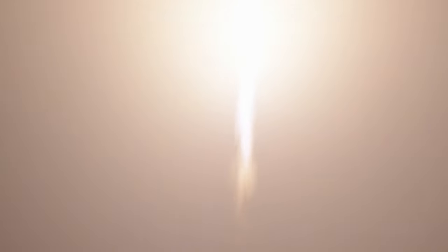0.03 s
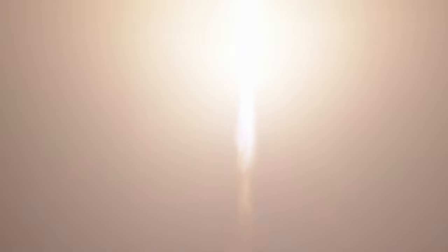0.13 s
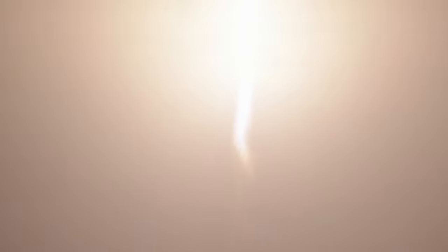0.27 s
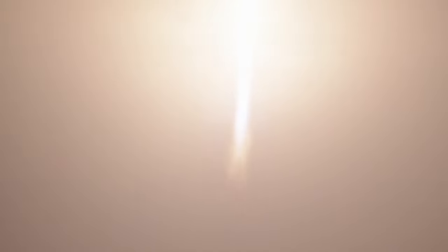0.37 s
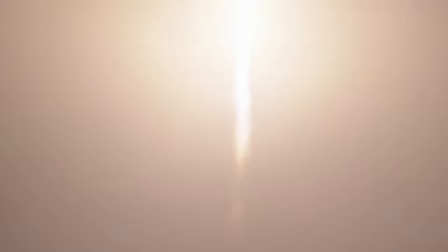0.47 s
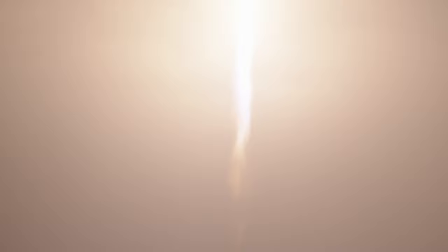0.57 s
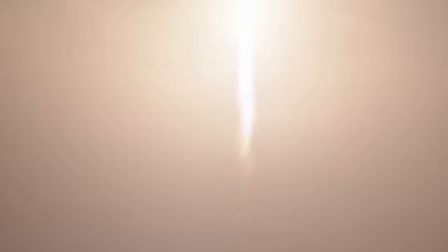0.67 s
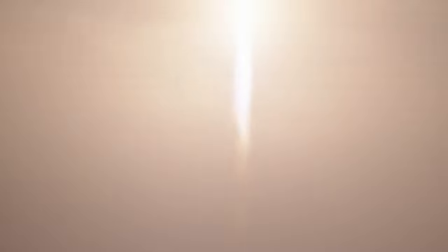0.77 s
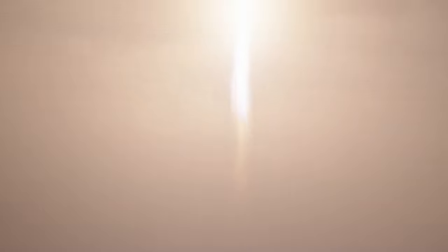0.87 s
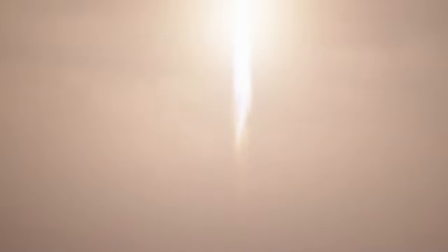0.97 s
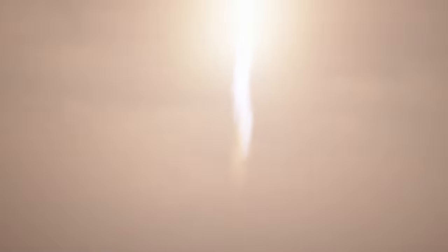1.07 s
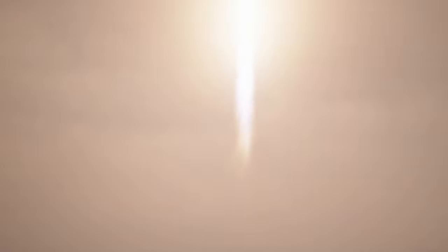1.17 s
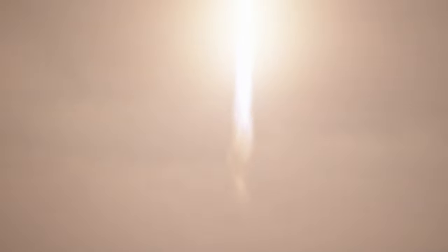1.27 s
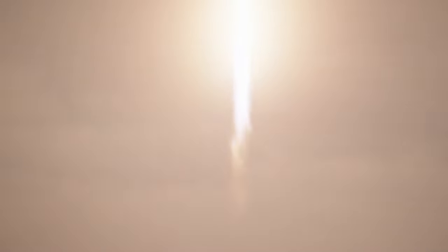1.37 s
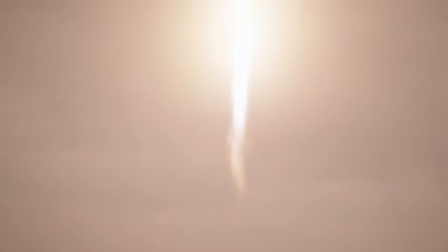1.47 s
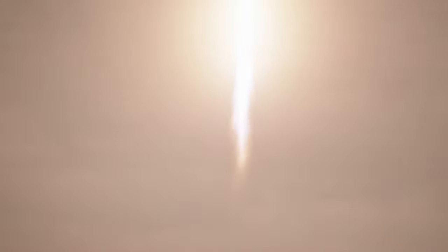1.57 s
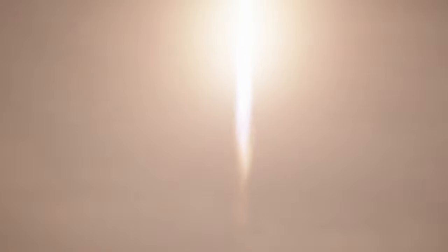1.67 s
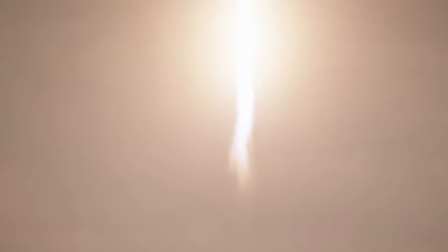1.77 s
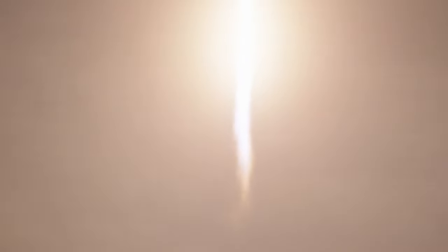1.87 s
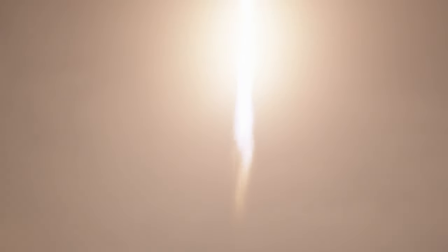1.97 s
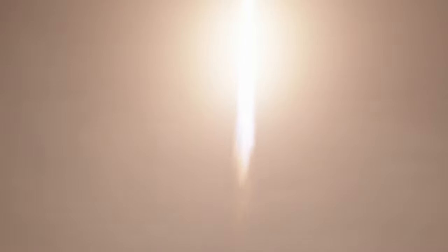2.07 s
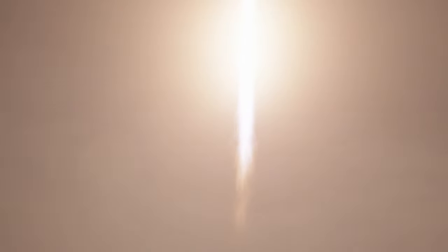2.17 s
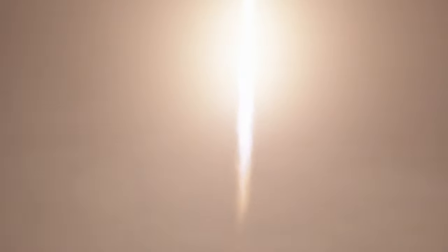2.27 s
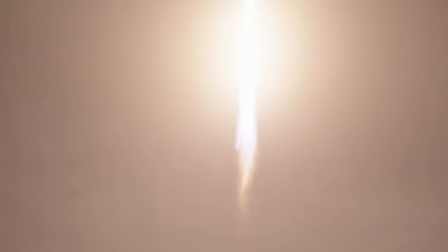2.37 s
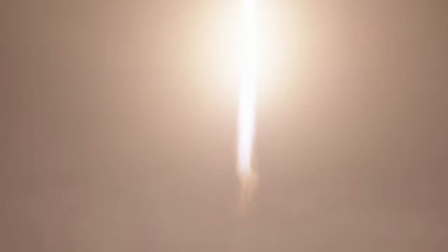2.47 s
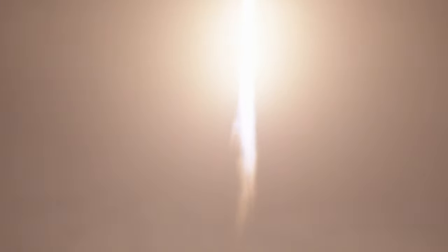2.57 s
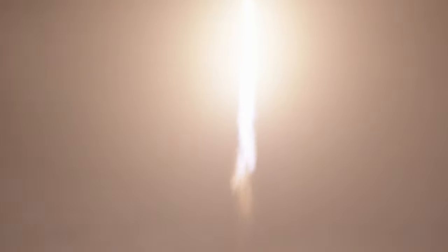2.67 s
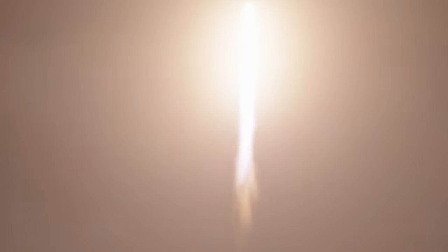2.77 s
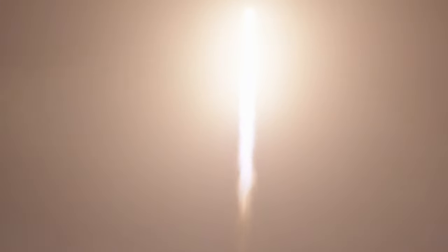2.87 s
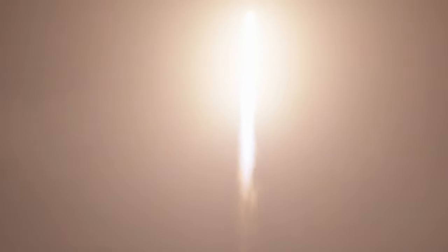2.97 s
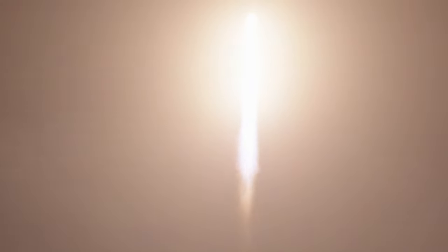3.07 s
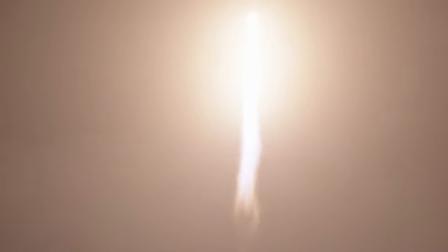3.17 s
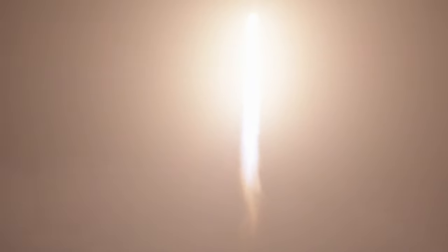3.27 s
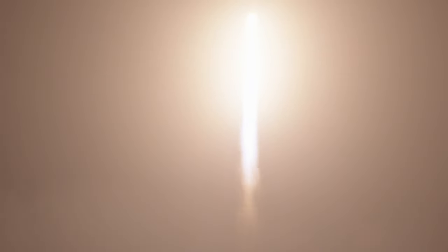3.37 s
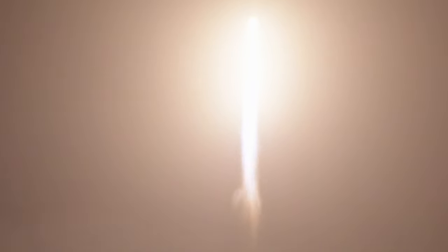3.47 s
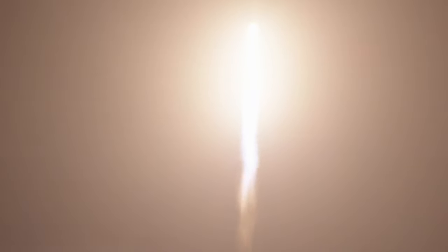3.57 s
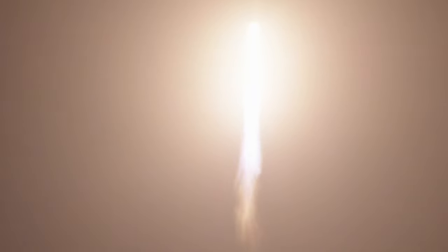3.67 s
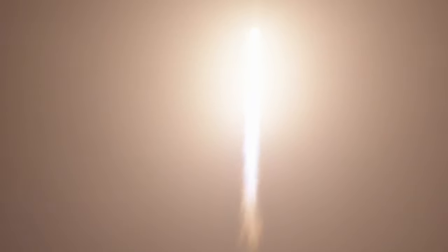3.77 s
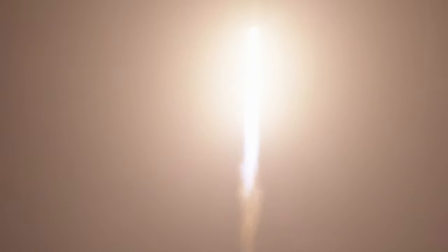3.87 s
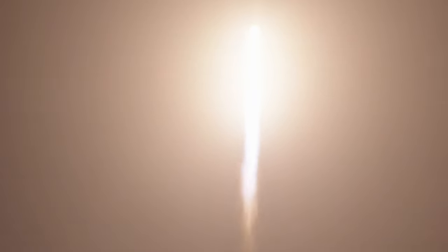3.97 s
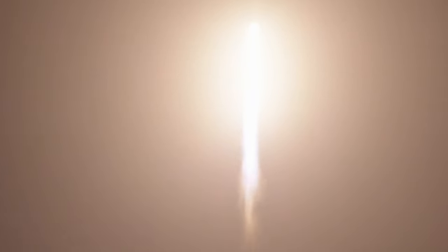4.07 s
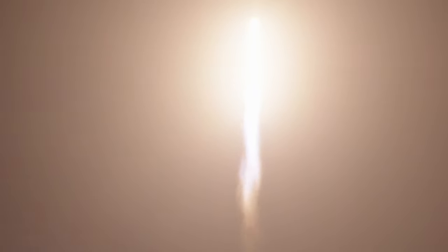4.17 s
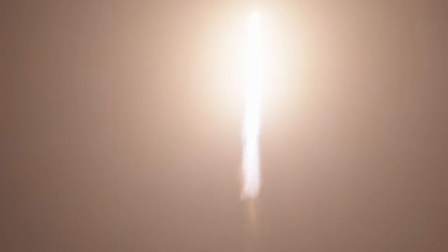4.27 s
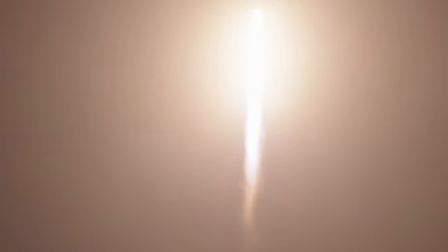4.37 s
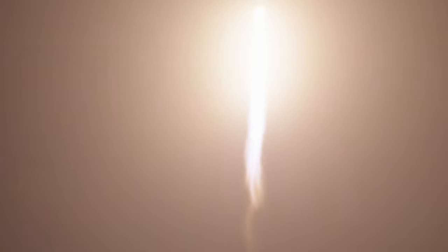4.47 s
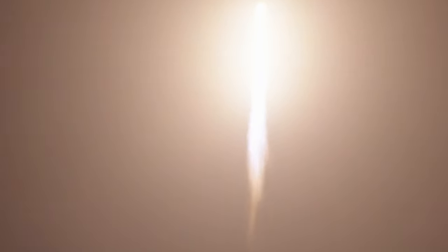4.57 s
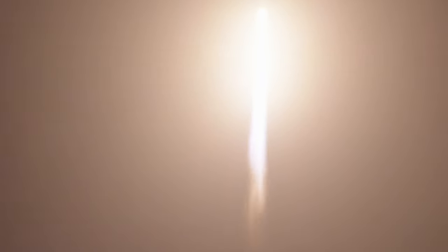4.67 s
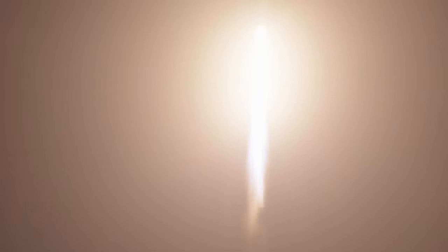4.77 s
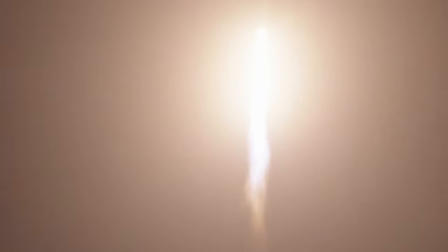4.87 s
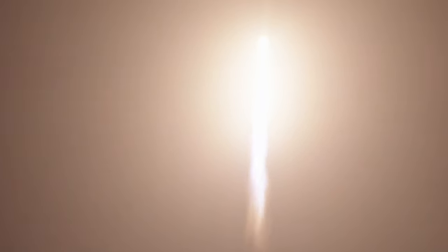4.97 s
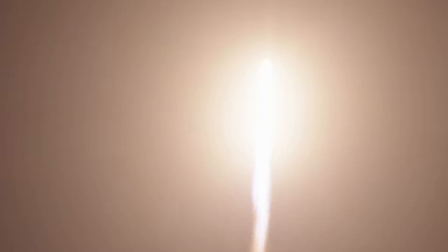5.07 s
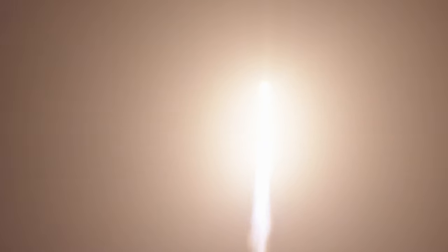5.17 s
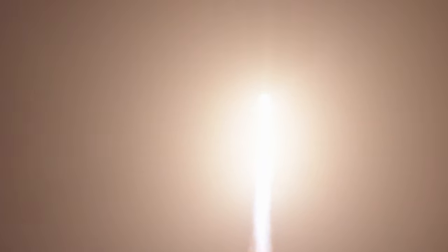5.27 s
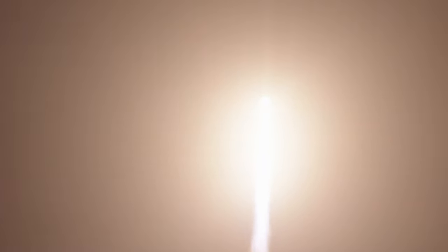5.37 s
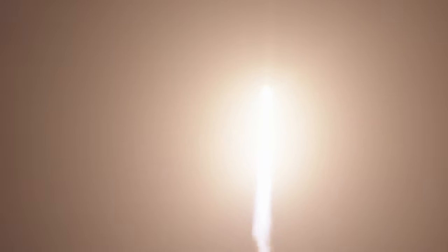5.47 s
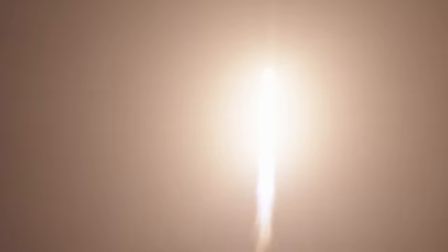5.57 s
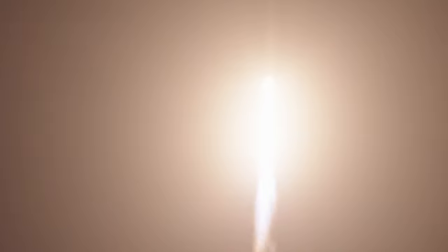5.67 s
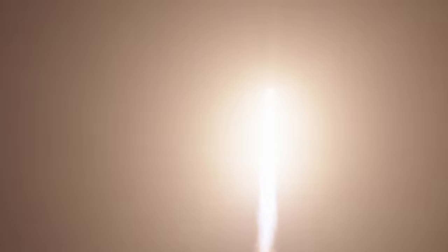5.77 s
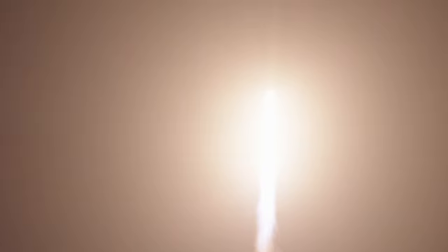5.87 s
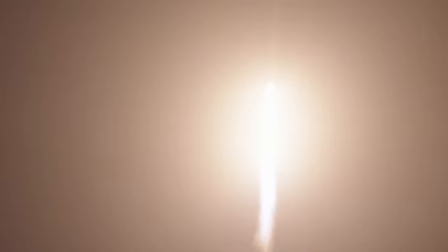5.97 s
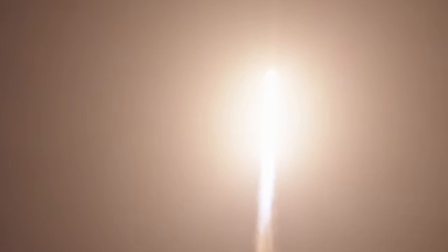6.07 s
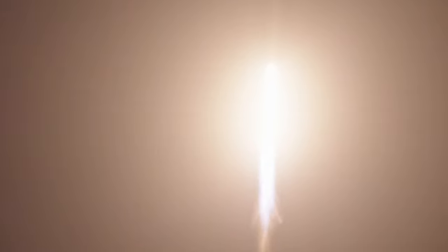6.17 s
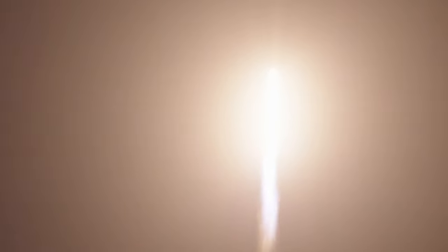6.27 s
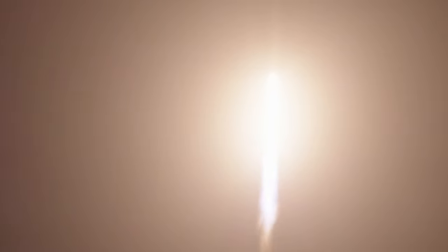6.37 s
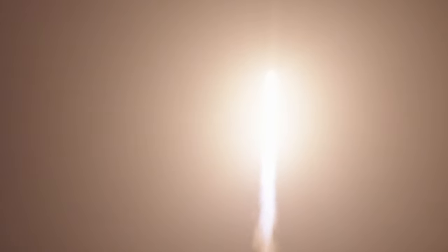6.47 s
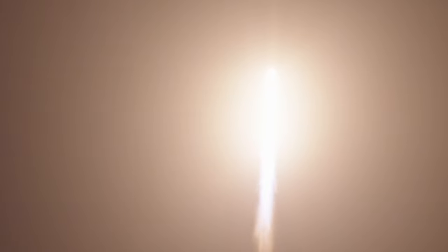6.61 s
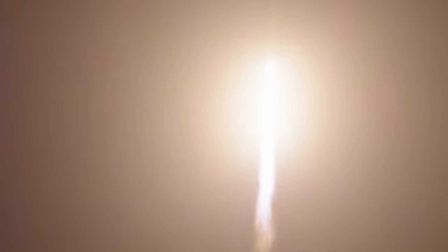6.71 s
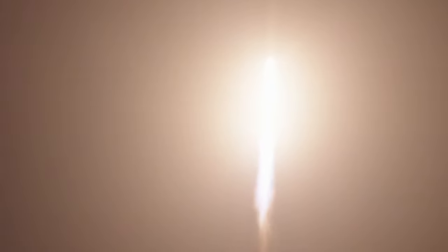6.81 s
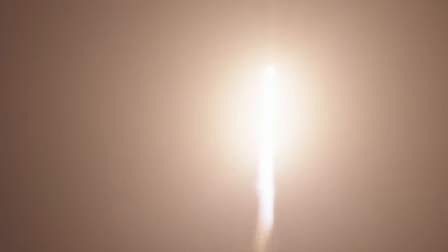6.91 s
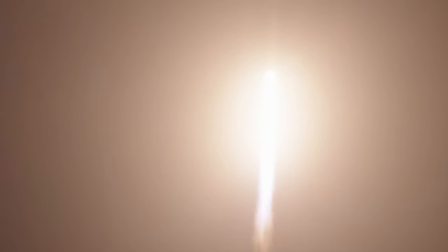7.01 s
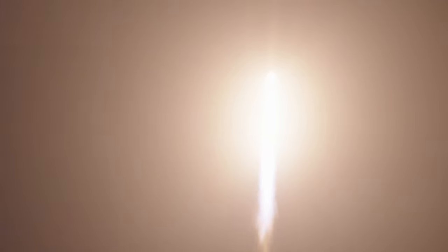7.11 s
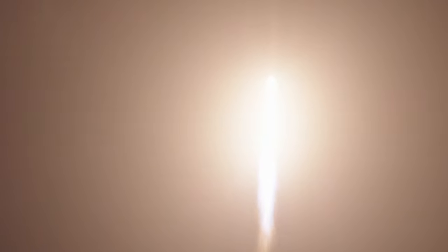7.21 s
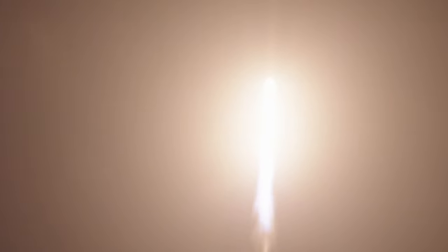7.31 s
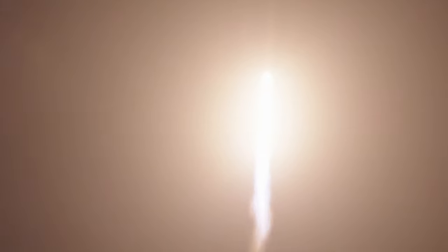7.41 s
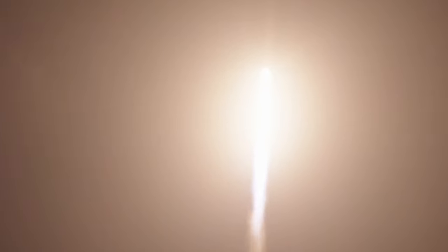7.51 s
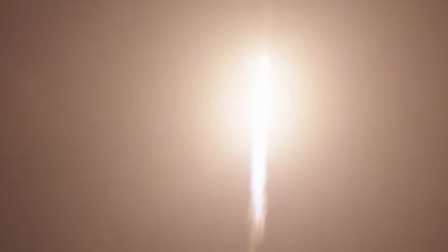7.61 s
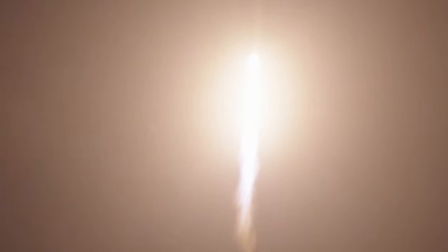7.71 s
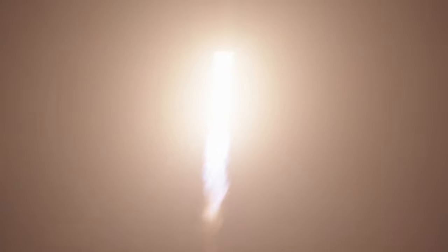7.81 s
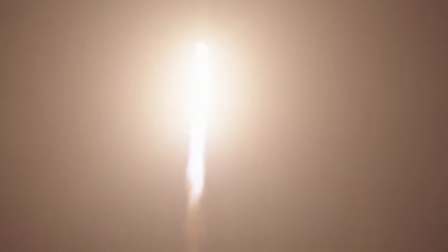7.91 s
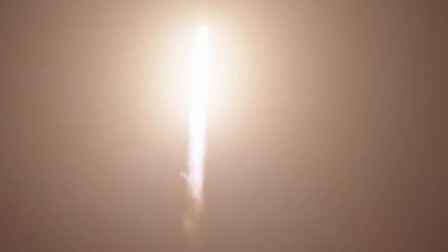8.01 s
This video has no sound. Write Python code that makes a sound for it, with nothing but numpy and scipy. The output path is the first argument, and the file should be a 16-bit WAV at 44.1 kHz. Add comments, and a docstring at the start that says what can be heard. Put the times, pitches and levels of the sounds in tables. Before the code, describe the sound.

A small microphone's hiss and thin whine frame the faint bass rumble of a distant rocket in open air. The rumble gradually grows, with muffled sputters and breathy puffs. After more than five seconds, separate dull thumps break through, then come faster and brighter, becoming a ripping barrage of hard cracks with bright sizzle between them, distorting and still loud when it stops.

```python
"""Outdoors, far from a launch: a rocket climbs away; its noise grows as the plume turns toward the listener.
Shaped noise makes the jet's turbulent rumble and roar; random bursts make its crackle, puffs and sizzle.
Its strongest pressure waves steepen into shocks: dull, scattered thuds at first, then sharp cracks that
overload a small microphone. The electronics add steady hiss, a faint harmonic whine and a lone tone."""
import sys
import numpy as np
from scipy import signal
from scipy.fft import rfft, irfft, next_fast_len
from scipy.io import wavfile
from scipy.ndimage import uniform_filter1d

SR = 44100
rng = np.random.default_rng(int(sys.argv[2]) if len(sys.argv) > 2 else 0)


def int16_out(signal):
    """Quantize to a 16-bit WAV file."""
    q = np.round(np.clip(np.atleast_2d(signal).T, -1, 1) * 32767)
    wavfile.write(sys.argv[1], SR, q.astype(np.int16))


N = 355005

# jet loudness, the drive of turbulence and weak shocks: [t/s, drive level/dB]
JET = [(0.0, -40.5), (1.75, -39), (2.0, -38.5), (4.0, -35), (4.3, -33.5), (4.95, -33), (5.3, -30.5),
       (5.95, -29.5), (6.4, -28.5), (6.7, -25.5), (7.15, -28.5), (7.9, -13)]
# loudest shock waves, peaks before the gains in shocks(): [t/s, compression level/dB, crack level/dB]
SHOCKS = [(5.672, -21, -30.5), (5.7435, -21, -35), (5.805, -22.5, -35.5), (5.8402, -18.5, -31),
          (5.871, -16.5, -35), (5.9283, -23, -28.5), (5.9717, -14.5, -31.5), (6.013, -17, -31.5),
          (6.0473, -18, -32), (6.132, -18.5, -31.5), (6.1746, -20.5, -35), (6.2097, -20, -28),
          (6.2421, -15, -27.5), (6.334, -14.5, -27), (6.4667, -15.5, -28), (6.538, -11, -27),
          (6.565, -14.5, -28), (6.6079, -11, -27), (6.638, -13, -20.5), (6.6762, -9.5, -23.5),
          (6.7414, -12, -24.5), (6.764, -10.5, -25.5), (6.8221, -13, -25), (6.862, -12.5, -28),
          (6.881, -14, -24), (6.912, -10.5, -21), (6.9398, -8, -25), (6.9557, -9.5, -25.5),
          (6.99, -7.5, -20.5), (7.026, -12, -22), (7.0557, -8.5, -16.5), (7.077, -7.5, -17.5),
          (7.087, -12, -27), (7.1021, -12.5, -23), (7.1241, -7, -16.5), (7.1426, -6, -15),
          (7.1613, -16, -22), (7.1904, -4.5, -16), (7.199, -13, -19.5), (7.216, -6, -13),
          (7.235, -6.5, -11.5), (7.2584, -6.5, -11.5), (7.2686, -5, -11.5), (7.3048, -9, -19.5),
          (7.3185, -10, -16), (7.3245, -6.5, -17), (7.3508, -5.5, -9), (7.368, -9.5, -22),
          (7.3944, -7.5, -18), (7.4183, -6.5, -12.5), (7.451, -5.5, -15), (7.484, -9.5, -22),
          (7.4974, -13, -18.5), (7.5195, -0.5, -10), (7.551, -7, -9.5), (7.566, -10.5, -13.5),
          (7.572, -11, -19), (7.5836, -4.5, -10.5), (7.6114, -7, -9), (7.6186, -5, -13.5),
          (7.6484, -5.5, -8.5), (7.6875, -4.5, -17.5), (7.7274, -9, -9.5), (7.7616, -6.5, -9.5),
          (7.7734, -9, -10.5), (7.7878, -6.5, -13.5), (7.8051, -7, -8.5), (7.837, -7.5, -9.5),
          (7.8566, 2, -11), (7.874, -7, -14.5), (7.899, -8, -19.5), (7.9127, -3, -6), (7.936, -5.5, -12.5),
          (7.9642, -7, -22.5), (7.9773, -12.5, -21), (8.0061, -3.5, -14), (8.0285, -9, -21.5)]
# spectrum of blurred weak fronts: [f/Hz, relative level/dB]
PUFF_COLOUR = [(200, -13), (550, 6), (1200, 1), (2050, -4.5), (3000, -13.5), (4000, -20), (5400, -33),
               (7500, -43.5), (16000, -46)]
# above this drive the growth goes mostly into shocks; turbulence keeps only a share of it
BREAK_DB, TURBULENCE_SHARE = -27, .22
# roar relative to the jet's drive, and its ceiling
ROAR_DB, ROAR_CEILING_DB = -20.4, -43.5


def undb(db):
    """Decibels to gain."""
    return 10 ** (np.asarray(db) / 20)


def unit(x):
    """Scale to rms 1."""
    return x / np.sqrt(np.mean(x ** 2))


def curve(rows):
    """Join (t/s, value) rows by straight lines, one value per sample."""
    return np.interp(np.arange(N) / SR, *np.transpose(rows))


def response(points, size):
    """Minimum-phase (causal) frequency response through (f/Hz, level/dB) points, via the folded cepstrum."""
    hz, db = np.transpose(points)
    log_hz = np.log(np.fft.rfftfreq(size, 1 / SR) + 1)
    cepstrum = irfft(np.log(undb(np.interp(log_hz, np.log(hz), db))))
    cepstrum[1:size // 2] *= 2
    cepstrum[size // 2 + 1:] = 0
    return np.exp(rfft(cepstrum))


def colour(x, points):
    """Give a signal a spectrum and rms 1."""
    size = 2 * next_fast_len(N // 2 + 1)
    shaped = irfft(rfft(x, size) * response(points, size))
    return unit(shaped[:N])


def walk(rate_hz):
    """Random levels held 1 / rate_hz and smoothed twice; rms 1."""
    k = max(int(SR / rate_hz), 1)
    held = np.repeat(rng.standard_normal(N // k + 1), k)
    smooth = uniform_filter1d(uniform_filter1d(held, k), k)
    return unit(smooth[:N])


def add(out, x, start):
    """Mix a short sound in at a sample index."""
    a, b = max(start, 0), min(start + len(x), len(out))
    out[a:b] += x[a - start:b - start]


def fade(x, seconds):
    """Let every value die away exponentially."""
    keep = np.exp(-1 / (seconds * SR))
    return signal.lfilter([1 - keep], [1, -keep], x)


def bursts(per_second, energy_tail_s, size_db, lift_db=0):
    """Noise in random bursts of uneven size; each starts abruptly and its energy decays exponentially."""
    sizes = undb(size_db * np.minimum(rng.exponential(size=N), 3) + lift_db)
    starts = rng.random(N) < per_second / SR
    energy = fade(starts * sizes ** 2, energy_tail_s)
    return np.sqrt(energy) * rng.standard_normal(N)


def irregular_times(per_second, jitter):
    """Moments of a loosely regular series; each strays by a share of the mean gap."""
    strays = rng.standard_normal(1024)
    times = (np.arange(len(strays)) + .5 + jitter * strays) / per_second
    return times[(times > 0) & (times < N / SR)]


def turbulence_db():
    """Level of the plume's eddies: follows the jet, more slowly once the waves break into shocks."""
    jet = curve(JET)
    return jet - (1 - TURBULENCE_SHARE) * np.maximum(jet - BREAK_DB, 0)


def roar_db():
    """Level of the small wavelets: follows the jet until the shocks take the rest."""
    return np.minimum(curve(JET) + ROAR_DB, ROAR_CEILING_DB)


def electronics(hiss_db=-76, switch_hz=999, wobble_hz=124, wobble_rad=0.19, drift_rad=0.13,
                lone_hz=2666, lone_db=-87):
    """Electronic hiss, a switching whine whose timing wobbles and drifts, and one lone tone."""
    # whine harmonics: [multiple of switching rate, rms level/dB]
    whine_rows = [(1, -75.5), (2, -78.5), (3, -80.5), (4, -83.5), (5, -86.5), (6, -88.5), (7, -91.5),
                  (8, -100)]
    # hiss spectrum: [f/Hz, relative level/dB]
    hiss_colour = [(1000, -15.5), (4000, -4), (7500, -7), (10000, -5.5), (13000, -2.5), (15500, -1.5),
                   (16000, -38)]
    turn = 2 * np.pi * np.arange(N) / SR
    phase = switch_hz * turn + wobble_rad * np.sin(wobble_hz * turn) + drift_rad * walk(6.5)
    whine = sum(undb(db) * np.sin(round(k) * phase) for k, db in whine_rows)
    lone = undb(lone_db) * np.sin(lone_hz * turn)
    hiss = undb(hiss_db) * colour(rng.standard_normal(N), hiss_colour)
    return np.sqrt(2) * (whine + lone) + hiss  # sqrt 2: rms to peak


def rumble(skew=0.035, gain_db=-0.28, small_eddy_hz=165, brighten_db_per_db=0.37, neutral_db=-36,
           brighten_limit_db=2):
    """Large plume eddies; compressions slightly taller than suctions, smaller eddies join with level."""
    # rumble spectrum: [f/Hz, relative level/dB]
    rumble_colour = [(10, -7), (20, -15), (32, 3), (55, -0.5), (100, 0.5), (140, -6.5), (200, -10.5),
                     (260, -18.5), (340, -27), (500, -29.5), (1000, -90)]
    pressure = colour(rng.standard_normal(N), rumble_colour)
    high_pass = signal.butter(3, small_eddy_hz, "high", fs=SR, output="sos")
    small = signal.sosfiltfilt(high_pass, pressure)
    level_db = turbulence_db()
    brighten_db = np.minimum(brighten_db_per_db * (level_db - neutral_db), brighten_limit_db)
    pressure = pressure + (undb(brighten_db) - 1) * small
    skewed = unit(pressure + skew * (pressure ** 2 - 1))
    return pressure, skewed * undb(level_db + gain_db)


def roar(pressure, ride_db=0.0, flutter_db=0.5):
    """Small wavelets merge into noise that flutters in the moving air; ride_db ties it to rumble crests."""
    # roar spectrum: [f/Hz, relative level/dB]
    roar_colour = [(150, -19.5), (350, 0), (560, 1), (800, -1.5), (1100, -9), (1450, -15.5), (2050, -22),
                   (3000, -31), (4000, -42), (5300, -37), (7500, -53.5), (16000, -65.5)]
    wash = colour(rng.standard_normal(N), roar_colour)
    return unit(wash * undb(ride_db * pressure + flutter_db * walk(35))) * undb(roar_db())


def crackle(pressure, ride_db=3, early_db=-7, late_db=0.5):
    """Small fronts break in random bursts, stronger on the crests of the rumble."""
    lift_db = ride_db * np.minimum(pressure, 2)
    sputter = bursts(per_second=160, energy_tail_s=0.0042, size_db=2, lift_db=lift_db)
    level_db = turbulence_db() + ROAR_DB + np.linspace(early_db, late_db, N)
    return colour(sputter, PUFF_COLOUR) * undb(level_db)


def weak_puffs(per_second=7.5, jitter=0.41, above_roar_db=1.0, limit_db=-55, spread_db=2.5):
    """Lesser flurries whose mean level follows the turbulence up to a limit; levels before the puff gain."""
    times = irregular_times(per_second, jitter)
    scatter_db = spread_db * rng.standard_normal(1024)[:len(times)]
    follow_db = turbulence_db()[(times * SR).astype(int)] + ROAR_DB + above_roar_db
    return list(zip(times, np.minimum(follow_db, limit_db) + scatter_db))


def puffs(gain_db=-4.0, rise_s=0.013, fall_s=0.015, grain_db=3):
    """Flurries of fronts too weak to be heard singly: grainy noise under Gaussian swells."""
    # loudest flurries: [t/s, level before gain_db/dB]
    loud_puffs = [(0.813, -62), (0.982, -54), (1.392, -51), (1.681, -52.5), (2.533, -51), (2.94, -52.5),
                  (3.205, -50), (3.889, -54), (4.59, -50), (5.37, -49), (5.437, -47), (5.813, -47.5),
                  (6.039, -42), (6.133, -43.5)]
    t = np.arange(N) / SR
    swell = np.zeros(N)
    for s, db in loud_puffs + weak_puffs():
        near = slice(max(int((s - .1) * SR), 0), int((s + .1) * SR))
        late = t[near] - s
        width_s = np.where(late < 0, rise_s, fall_s)
        swell[near] += undb(db + gain_db) * np.exp(-(late / width_s) ** 2 / 2)
    noise = colour(rng.standard_normal(N), PUFF_COLOUR)
    return swell * unit(noise * undb(grain_db * walk(400)))


def pressure_wave(ms, width_ms, steep, suction=0.57, suction_lag=3.23, suction_width=1.64,
                  delay_ms=0.81, front_ms=0.59):
    """Compression, then longer suction (lag and width in widths); steep waves pile up behind the front."""
    u = (ms - delay_ms * steep) / width_ms
    wave = np.exp(-u ** 2 / 2) - suction * np.exp(-((u - suction_lag) / suction_width) ** 2 / 2)
    ahead = (1 - np.tanh(ms / front_ms)) / 2
    return wave * (1 - steep * ahead)


def weak_shocks(per_second=38, jitter=.25, push_db=-22.5, crack_db=-36.0, push_growth=1.24,
                crack_growth=2.1, spread_db=2.0, push_limit_db=-15.0, crack_limit_db=-27, clear_s=.011):
    """Loose stream of lesser shocks growing faster than the jet; a loud shock swallows close ones."""
    times = irregular_times(per_second, jitter)
    gap_s = np.abs(times[:, None] - np.array(SHOCKS)[:, 0]).min(axis=1)
    times = times[gap_s > clear_s]
    drive_db = np.interp(times, *np.transpose(JET)) - BREAK_DB
    scatter_db = spread_db * rng.standard_normal((1024, 2))[:len(times)]
    push = np.minimum(push_db + push_growth * drive_db, push_limit_db) + scatter_db[:, 0]
    crack = np.minimum(crack_db + crack_growth * drive_db, crack_limit_db) + scatter_db[:, 1]
    return list(zip(times, push, crack))


def shocks(size=4096, thud_gain_db=-1.48, crack_gain_db=-0.63, steep_gain_db=6.5,
           soft_width_ms=1.12, steep_width_ms=1.0, width_spread_db=.5,
           scatter_db=-14.5, steep_scatter_db=-21, early_ms=0.16, near_ms=1.37, far_ms=8, far_share=0.19,
           soft_front_hz=4630, sharp_front_hz=7640, faint_db=-31.5, dulling_db_per_db=0.39,
           air_hz=6100, sharpen_db=14, snap_db=-19, twin_db=-11, twin_ms=0.544, lean=0.27, body_hz=1050):
    """Each shock thuds and cracks; eddies on the way split weak fronts into several arrivals."""
    # crack spectrum: [f/Hz, relative level/dB]
    crack_colour = [(100, -24), (380, -1.5), (580, 5), (1000, 3), (2050, -1), (2900, -6.5), (4000, -14.5),
                    (5400, -13.5), (6500, -14.5), (7800, -23), (11000, -13), (12700, -8), (14500, -24.5),
                    (16000, -32.5)]
    out = np.zeros(N)
    lead = size // 4
    ms = (np.arange(size) - lead) / SR * 1000
    hz = np.fft.rfftfreq(size, 1 / SR)
    ring = response(crack_colour, size)
    after = np.exp(-abs(ms) / near_ms) + far_share * np.exp(-abs(ms) / far_ms)
    spread = np.where(ms < 0, np.exp(-abs(ms) / early_ms), after)
    waves = SHOCKS + weak_shocks()
    for (s, push_db, crack_db), chance in zip(waves, rng.standard_normal((len(waves), size))):
        # 0: rounded wave, 1: fully formed shock
        steep = np.clip((crack_db + 23.0) / 15, 0, 1)
        width_ms = soft_width_ms + (steep_width_ms - soft_width_ms) * steep
        width_ms = width_ms * undb(width_spread_db * chance[0])
        thud = undb(push_db + thud_gain_db) * pressure_wave(ms, width_ms, steep)
        # air absorbs the top of weak fronts; strong ones keep sharpening themselves
        reach_hz = air_hz * undb(sharpen_db * steep)
        # steeper fronts are brighter; cracks below faint_db grow duller still
        edge_hz = soft_front_hz * undb(dulling_db_per_db * min(crack_db - faint_db, 0))
        edge_hz = edge_hz + (sharp_front_hz - soft_front_hz) * steep ** 3
        edge = 1 / (1 + (hz / edge_hz) ** 4) + undb(snap_db) * steep
        # a fully formed shock has less low-middle body
        body = 1 - lean * steep / (1 + (hz / body_hz) ** 4)
        front = ring * edge * body / (1 + (hz / reach_hz) ** 6)
        scattered = spread * chance * abs(chance) / 2
        arrivals = (ms == 0) + undb(scatter_db + steep_scatter_db * steep) * scattered
        # a weaker twin on a slightly longer path gives each crack its own colour
        delay_s = twin_ms / 1000 * 2 ** (chance[2] / 2)
        twin = undb(twin_db) * np.exp(-2j * np.pi * hz * delay_s)
        crack = irfft(rfft(arrivals) * front * (1 + twin)) / irfft(front).max()
        crack_gain = undb(crack_db + crack_gain_db + steep_gain_db * steep)
        add(out, thud + crack_gain * crack, int(s * SR + 2 * chance[1]) - lead)
    return out


def sizzle(from_s=7.17, start_db=-60, growth_db_per_s=11, onset_s=0.14):
    """Bright, grainy bursts fade in late, between the sharpest cracks, and keep growing."""
    # sizzle spectrum: [f/Hz, relative level/dB]
    sizzle_colour = [(800, -14), (2500, -4), (3300, -1.5), (5200, -3.5), (7000, -12.5), (9000, -21.5),
                     (16000, -35)]
    grains = colour(bursts(per_second=390, energy_tail_s=0.0013, size_db=4.5), sizzle_colour)
    since_s = np.arange(N) / SR - from_s
    return np.clip(since_s / onset_s, 0, 1) * undb(start_db + growth_db_per_s * since_s) * grains


def scene():
    """The whole jet at one microphone, plus its electronics."""
    pressure, low = rumble()
    turbulence = low + roar(pressure) + crackle(pressure) + puffs()
    return (turbulence + shocks() + sizzle() + electronics())[None]


def record(dry, full_scale=.51, top_hz=16200):
    """The tallest shocks clip flat at full_scale; a steep low-pass cuts the top."""
    clipped = np.clip(dry, -full_scale, full_scale)
    return signal.sosfilt(signal.ellip(8, .2, 70, top_hz, fs=SR, output="sos"), clipped)


dry = scene()
out = record(dry)
int16_out(out)
```